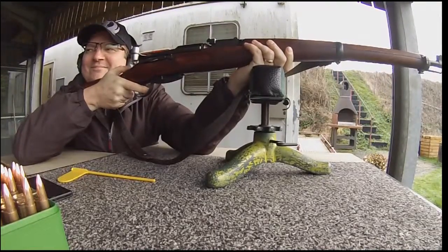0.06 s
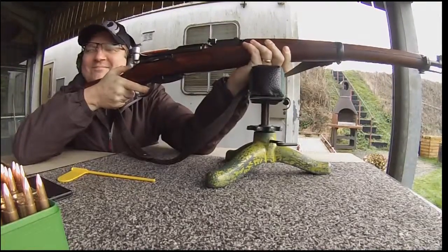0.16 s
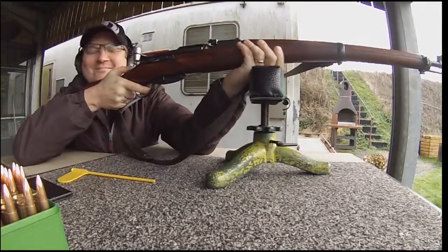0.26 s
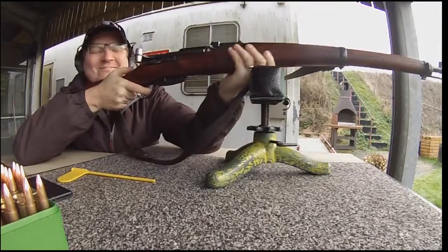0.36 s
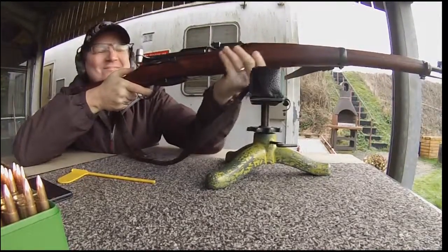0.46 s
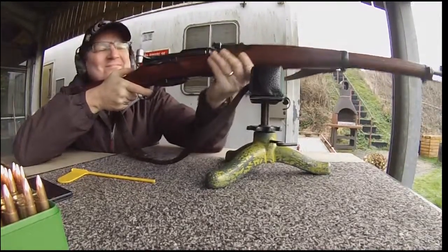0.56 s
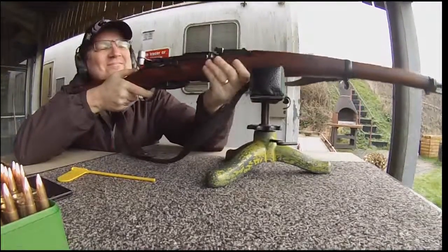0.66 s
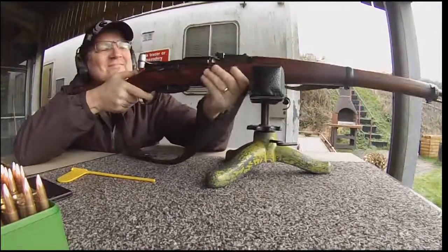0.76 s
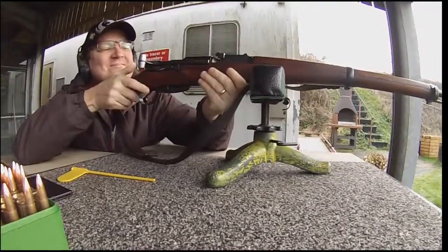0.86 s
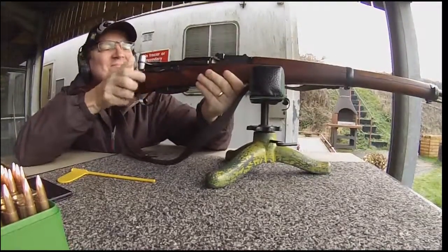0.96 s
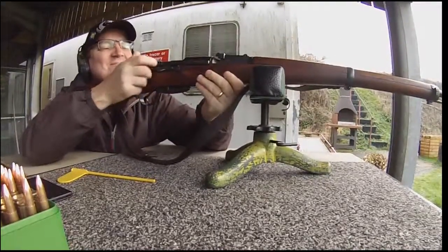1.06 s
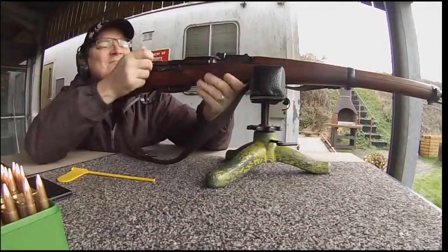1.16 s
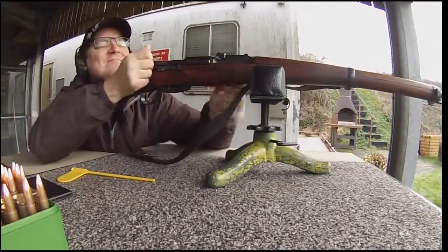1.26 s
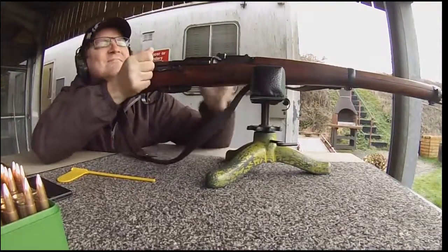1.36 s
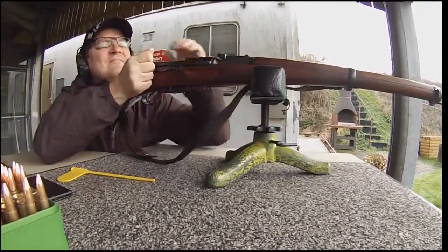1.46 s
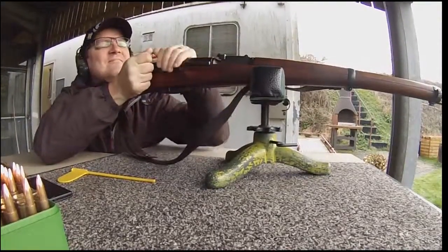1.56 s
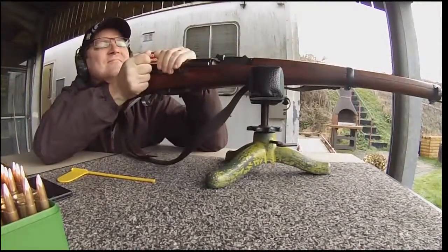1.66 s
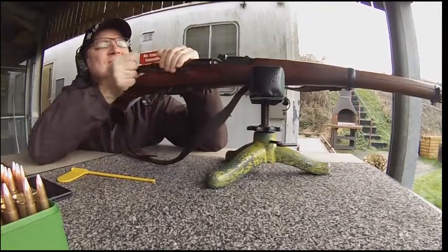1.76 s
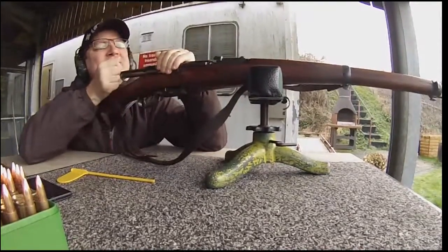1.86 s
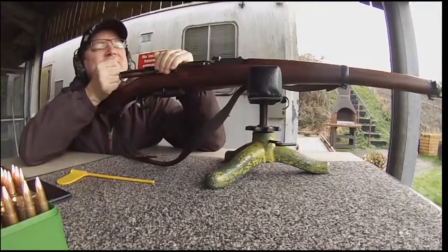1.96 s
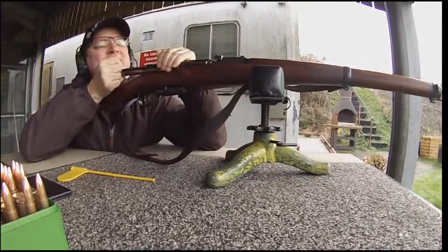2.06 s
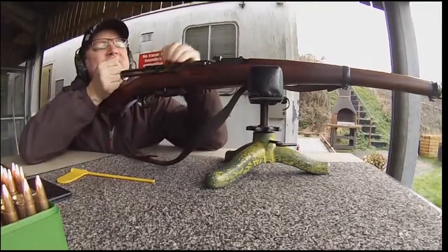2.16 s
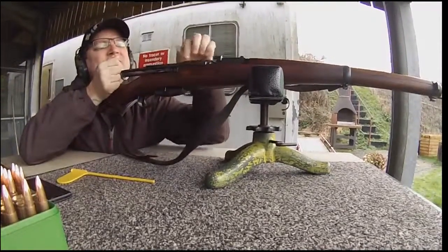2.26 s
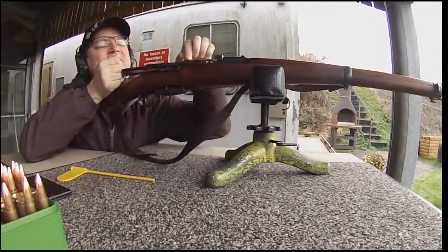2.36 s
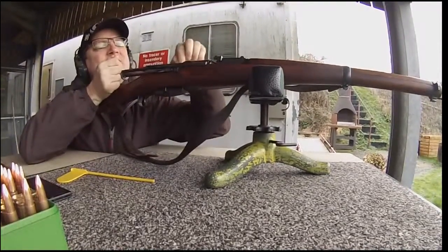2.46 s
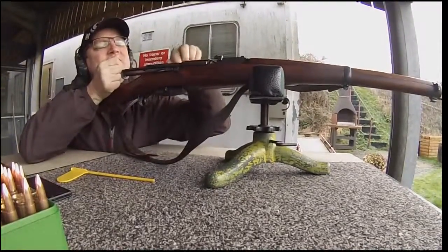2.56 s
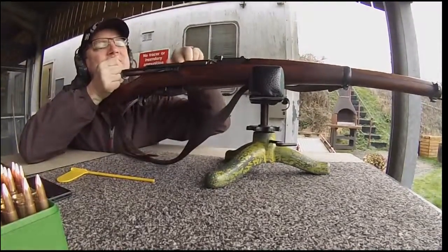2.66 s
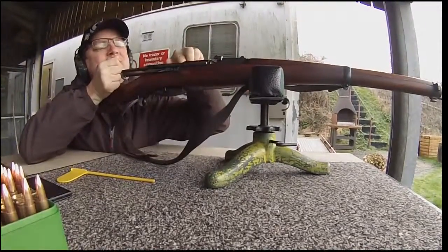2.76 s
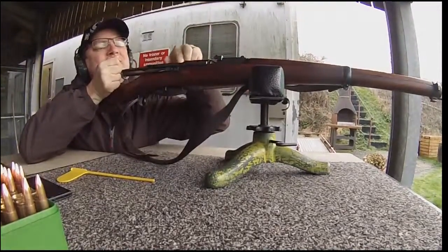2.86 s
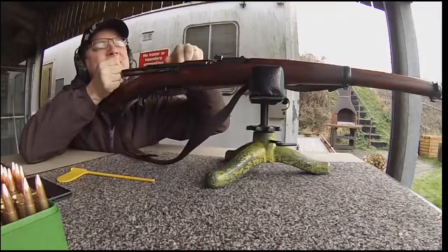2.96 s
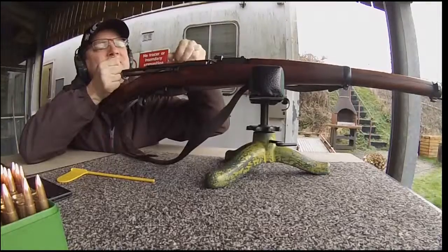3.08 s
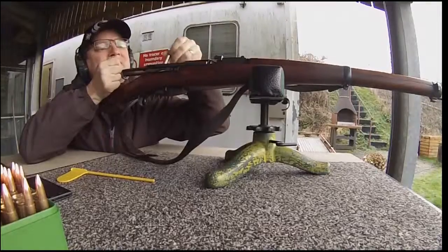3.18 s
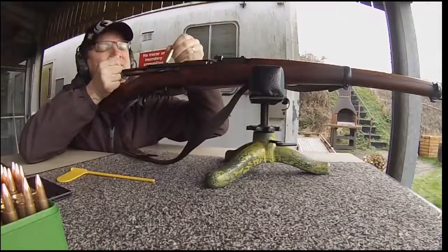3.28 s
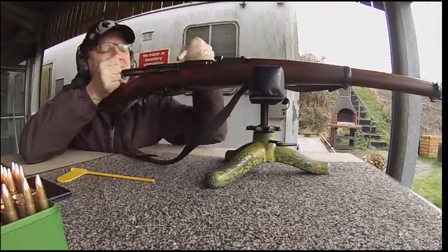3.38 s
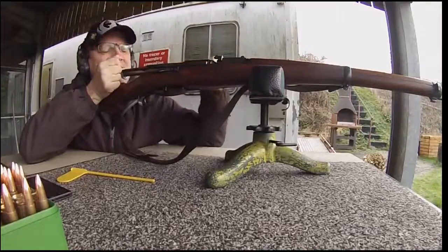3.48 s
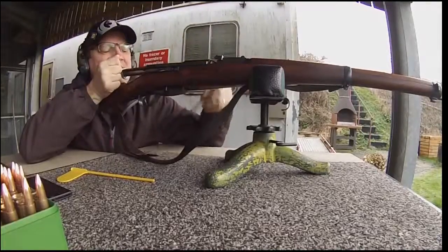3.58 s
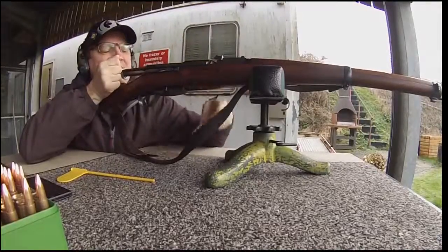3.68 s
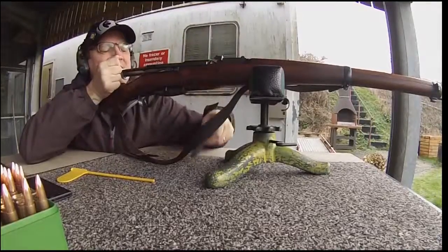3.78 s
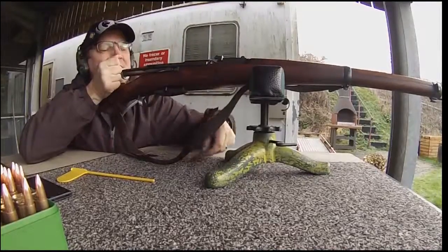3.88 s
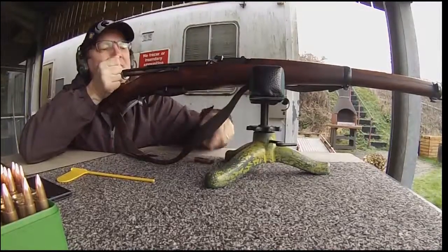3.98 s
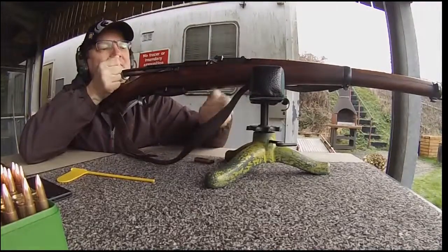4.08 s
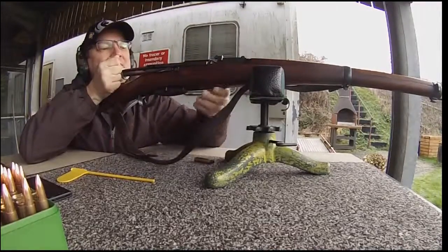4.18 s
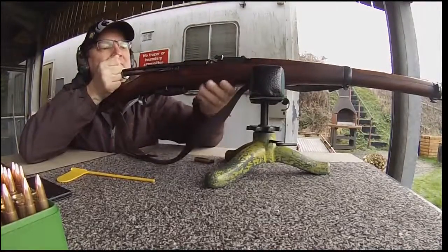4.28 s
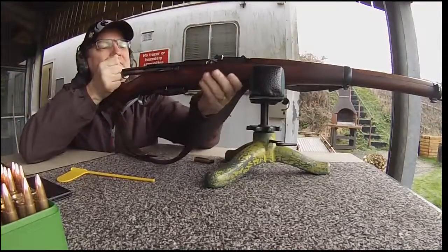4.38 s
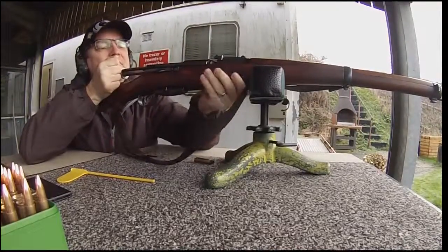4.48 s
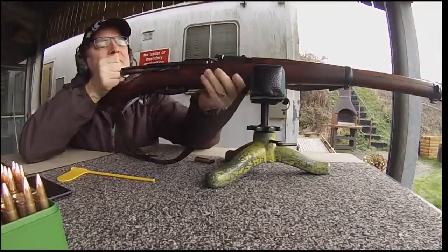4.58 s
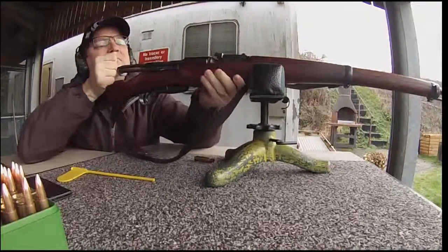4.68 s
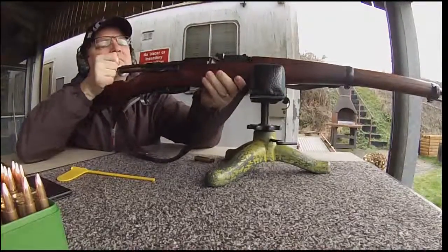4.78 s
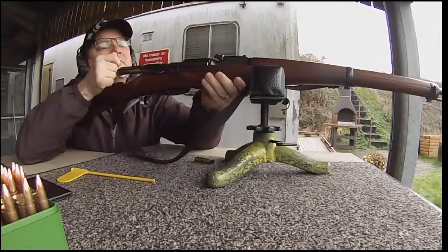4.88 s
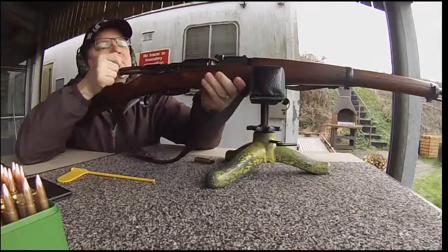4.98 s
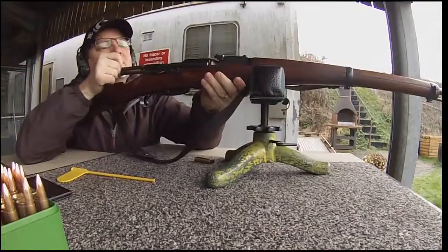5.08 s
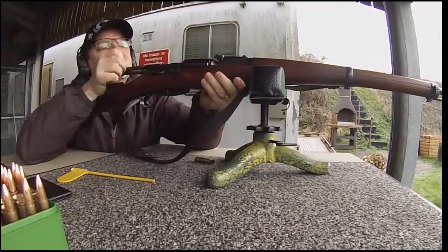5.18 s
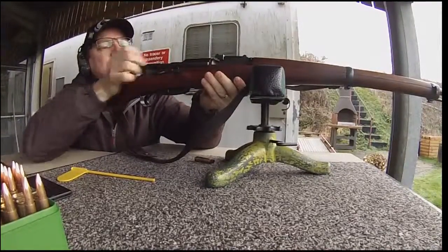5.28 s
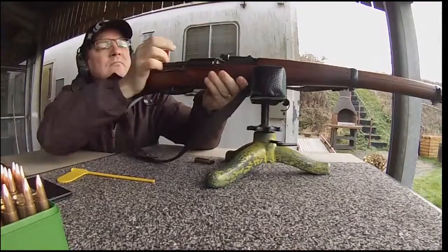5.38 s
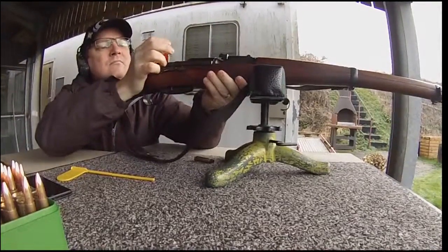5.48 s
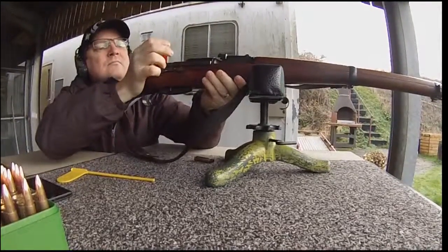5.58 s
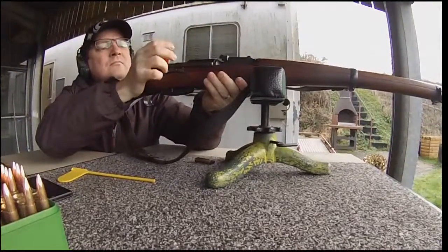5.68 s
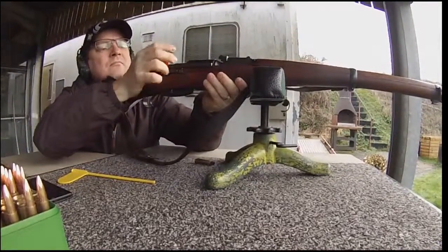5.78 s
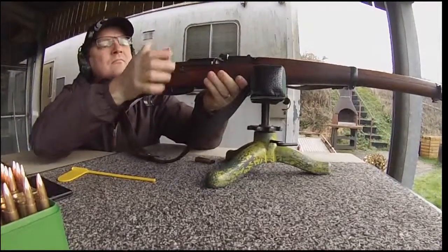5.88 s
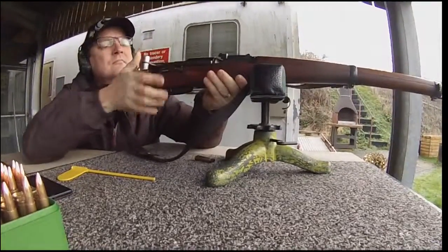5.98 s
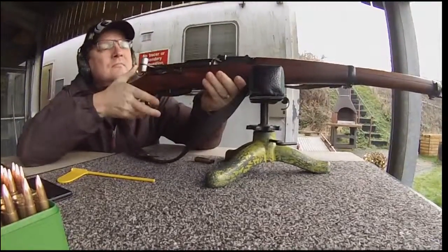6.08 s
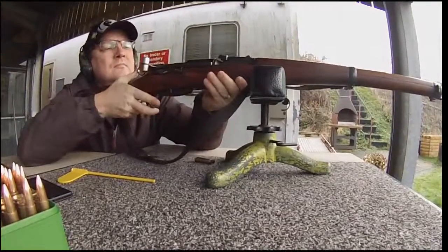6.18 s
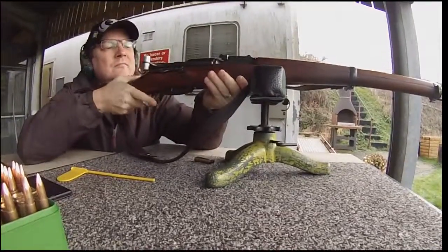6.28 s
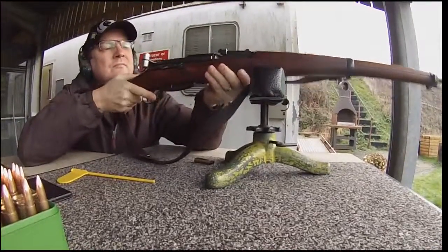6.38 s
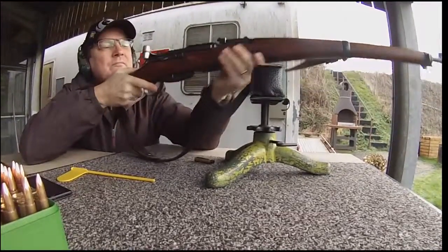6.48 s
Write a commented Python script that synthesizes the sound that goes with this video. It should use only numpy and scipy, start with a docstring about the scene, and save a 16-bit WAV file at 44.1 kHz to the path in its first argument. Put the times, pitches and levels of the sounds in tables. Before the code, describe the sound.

Close metallic clacks of a rifle bolt opening and later locking shut, with soft handling rustle and small hollow knocks in quiet air.

```python
"""Outdoors, at a roofed shooting bench: a rifle on a rest, heard close from a small camera on the same top.
In quiet air, elbows shake the bench and a sleeve brushes the rifle; the camera rocks and knocks on its base.
Near 1 s the bolt is lifted with a faint click; near 2 s it is drawn back: steel clacks ring under the roof
and the spent case pings free. A hand scrapes over the open action.
Just after 5 s the bolt is run home and locked, thumping the bench, and the camera knocks a little longer."""
import sys
import numpy as np
from scipy import signal
from scipy.fft import rfft, irfft, next_fast_len
from scipy.io import wavfile
from scipy.ndimage import uniform_filter1d

SR = 44100
rng = np.random.default_rng(int(sys.argv[2]) if len(sys.argv) > 2 else 0)


def log_audio(samples):
    """Write samples as a 16-bit WAV file to the path given in sys.argv[1]."""
    # one column per channel
    frames = np.atleast_2d(samples).T
    # limit to full scale, then quantise
    limited = np.clip(frames, -1, 1)
    pcm = np.round(limited * 32767).astype(np.int16)
    wavfile.write(sys.argv[1], SR, pcm)


N = 288237
TIME = np.arange(N) / SR
AGE = TIME[:SR // 3]  # seconds into one short sound


def undb(db):
    """Decibels to gain."""
    return 10 ** (np.asarray(db) / 20)


def colour(x, points):
    """Filter by a (Hz, dB) spectrum, causally, so that attacks stay sharp."""
    size = 2 * next_fast_len(len(x))
    hz, db = np.transpose(points)
    log_hz = np.log(np.fft.rfftfreq(size, 1 / SR) + 1)
    cepstrum = irfft(np.log(undb(np.interp(log_hz, np.log(hz), db))))
    cepstrum[1:size // 2] *= 2  # fold to minimum phase
    cepstrum[size // 2 + 1:] = 0
    return irfft(rfft(x, size) * np.exp(rfft(cepstrum)))[:len(x)]


def noise(points):
    """Coloured noise of rms 1."""
    x = colour(rng.standard_normal(N), points)
    return x / x.std()


def walk(rate_hz):
    """Smooth random wander with a spread of 1."""
    hold = int(SR / rate_hz)
    steps = np.repeat(rng.standard_normal(N // hold + 1), hold)
    x = uniform_filter1d(steps, hold)[:N]
    return x / x.std()


def hit(x, db, span_s=.005):
    """Scale a blow to the energy of span_s seconds at this level."""
    return x * undb(db) / np.sqrt(np.sum(x ** 2) / (SR * span_s))


def add(track, s, x):
    """Mix a sound into the track at s seconds."""
    i = max(int(s * SR), 0)
    track[i:i + len(x)] += x[:max(N - i, 0)]


def mode(hz, t60):
    """One fading sine."""
    return np.sin(2 * np.pi * hz * AGE) * undb(-60 * AGE / t60)


def chatter(contact_s):
    """Contact force: a burst of tiny collisions that swells and dies on the scale of contact_s."""
    u = AGE / max(contact_s, 1 / SR)
    return np.sign(rng.standard_normal(len(AGE))) * u * np.exp(-u * np.sqrt(u))


def gesture(s, db, rise_s, fall_s):
    """Gain over time of one movement: it grows to its peak at s, then dies away."""
    t = TIME - s
    return undb(db) * np.exp(-np.abs(t) / np.where(t < 0, rise_s, fall_s))


def together(gains):
    """Overlapping movements add in power."""
    return np.sqrt(sum(g ** 2 for g in gains))


# Open air with microphone hiss, and a low rustle. Each row: frequency in Hz, relative level in dB.
AIR_SPECTRUM = [(15, -43), (25, 11), (93, 0), (246, 0), (322, -3.5), (399, -7), (567, -7), (804, -8.5),
                (1270, -12), (1450, -12), (2490, -14.5), (2920, -13), (3530, -17), (13900, -30.5),
                (15500, -45.5)]
RUSTLE_SPECTRUM = [(100, -22), (250, 7), (600, 8), (1100, -3), (2500, -10), (8000, -21.5)]
# Swells of that rustle. Each entry: its middle in seconds.
SWELL_TIMES = [0.2, 1.054, 2.553, 2.96, 3.14, 3.363, 3.72, 3.94, 4.503, 5.13]

def outdoors(air_db=-57.38, flicker_db=-.42, swell_db=-57.5, swell_width_s=.033):
    """Quiet air all around the shelter, with a few soft swells of rustle."""
    swells = sum(np.exp(-((TIME - s) / swell_width_s) ** 2 / 2) for s in SWELL_TIMES)
    air = noise(AIR_SPECTRUM) * undb(air_db + flicker_db * walk(2.7))
    return air + undb(swell_db) * swells * noise(RUSTLE_SPECTRUM)


# Low thumps through the bench from the bolt's strokes and shifting weight.
# Each row: peak in seconds, relative level in dB.
BENCH_THUMPS = [(0.05, -39.5), (0.19, -51.5), (1.52, -48.5), (1.68, -43.5), (1.915, -30.5), (5.21, -49),
                (5.364, -28.5), (5.431, -33)]
# The bench top under the microphone. Each row: frequency in Hz, relative level in dB.
RUMBLE_SPECTRUM = [(20, -14.5), (45, -6.5), (70, -8.5), (90, -3.5), (115, -0.5), (160, -20), (300, -26.5),
                   (700, -36.5), (3000, -86)]
SHAKE_SLOPE = .65  # dB of rumble and sway per dB of camera knock

def bench_rumble(thump_db=-7, shake_db=-21.5, rise_s=.0092, fall_s=.07):
    """The bench rumbles with each low thump and around each knock of the camera."""
    pushes = [(s, db + thump_db) for s, db in BENCH_THUMPS]
    pushes += [(s, SHAKE_SLOPE * knock + shake_db) for s, knock, _, _ in CAMERA_KNOCKS]
    return noise(RUMBLE_SPECTRUM) * together(gesture(s, db, rise_s, fall_s) for s, db in pushes)


# Fingers and sleeve brush the rifle. Each row: peak in seconds, relative level in dB, fade in seconds.
SLEEVE_BRUSHES = [(0.3, -59, .13), (0.94, -57.5, 0.058), (1.3, -60.5, 0.17), (1.6, -53, 0.15),
                  (3.306, -45, 0.015), (4.0, -59, 0.16), (4.95, -63, 0.39), (6.42, -61, .14)]
# Cloth and skin rubbing, heard close. Each row: frequency in Hz, relative level in dB.
CLOTH_SPECTRUM = [(900, -20), (1450, -17.5), (1750, 0.5), (2300, -13.5), (2900, -2), (3450, 6),
                  (4300, -8.5), (5400, -10.5), (8000, -16), (14000, -31)]
SKIN_SPECTRUM = [(100, -6), (350, -2), (1000, -3.5), (2300, -6.5), (3400, 4), (4500, -14), (7000, -22),
                 (14000, -42)]

def hand(rough_db=3, brush_db=-1):
    """Skin and cloth catch and slip on steel and wood; once, a hand scrapes over the open action."""
    brush = together(gesture(s, db + brush_db, fade, fade) for s, db, fade in SLEEVE_BRUSHES)
    scrape = gesture(s=2.696, db=-45, rise_s=.005, fall_s=.14)
    friction = noise(SKIN_SPECTRUM) * scrape + noise(CLOTH_SPECTRUM) * brush
    return friction * undb(rough_db * walk(250))


def jiggle(tip_s, lead_s=.005, trail_s=.018, grain_db=8):
    """Tiny contacts thicken as the camera tips and thin out after it lands, tip_s later."""
    t = AGE - tip_s
    knots = AGE[::100]
    grains = rng.standard_normal(len(AGE))
    grains *= undb(grain_db * np.interp(AGE, knots, rng.standard_normal(len(knots))))
    return grains * np.exp(-np.abs(t) / np.where(t < 0, lead_s, trail_s))


# The camera lands on the bench. Each row: start in seconds, then knock, tick and thump in relative dB.
CAMERA_KNOCKS = [(0.511, -34.5, -43.5, -27.5), (0.589, -45, -50.5, -35), (0.597, -37.5, -60, -41),
                 (0.638, -22, -35, -21.5), (0.714, -48.5, -76, -45), (0.746, -40, -50, -42),
                 (1.558, -55, -78.5, -36), (1.767, -45.5, -66, -35), (1.939, -37.5, -57, -48),
                 (1.964, -31, -64, -26), (2.016, -37, -47, -33), (2.0792, -37.5, -39.5, -55),
                 (2.1116, -37.5, -79, -32.5), (2.241, -40.5, -39, -54), (2.2748, -37.5, -69, -28.5),
                 (2.3831, -39, -41, -57), (2.4184, -37, -77.5, -28), (2.456, -49.5, -54, -47),
                 (4.639, -47, -56, -31.5), (4.6486, -37, -47.5, -40), (4.746, -23, -38.5, -32),
                 (4.778, -29.5, -42.5, -26), (4.859, -44.5, -58, -33), (4.884, -42, -52.5, -30.5),
                 (5.5623, -32.5, -75, -24.5), (5.613, -39, -47, -27), (5.673, -29.5, -66, -55),
                 (5.677, -31, -47, -33), (5.7053, -31, -39.5, -33.5), (5.784, -34, -44.5, -34),
                 (5.796, -33, -57, -38), (5.838, -24.5, -36, -23.5), (5.923, -29, -45.5, -28),
                 (5.9447, -35.5, -45, -28), (5.971, -44, -65, -37), (6.0308, -41.5, -44.5, -54),
                 (6.047, -27.5, -41, -22), (6.0651, -28.5, -41, -40), (6.1863, -33.5, -44.5, -57),
                 (6.198, -35.5, -56, -23), (6.32, -44, -45.5, -55), (6.366, -46, -80, -34)]
# Modes of camera and base. Each row: frequency in Hz, relative level in dB, 60 dB decay in seconds.
BASE_MODES = [(495, -25, .12), (974, -6, .033), (1125, -1, .04), (1350, -2, .02), (1620, 0, .03),
              (1852, -12, .09), (2100, -9, .012), (2417, -11, .022), (2665, -14, .11)]
# Its loose parts, and the tick of a hard landing. Each row: frequency in Hz, relative level in dB.
RATTLE_SPECTRUM = [(100, -10), (280, -3.5), (430, -19.5), (700, -7), (1150, -2), (1700, -2), (2500, -6),
                   (3500, -18.5), (6000, -44.5)]
TICK_SPECTRUM = [(1000, -29), (2500, -0.5), (3600, 4.5), (4900, -10.5), (6700, -2.5), (8000, -22.5),
                 (14000, -30.5)]

def camera_knocks(tip_s=.04, scatter_db=3, detune=.0084, soft_hard_db=(-30, -14), edge_hz=(1850, 3400)):
    """Landings rattle the base and swing the bench top, reaching the microphone dry through the solid."""
    out = np.zeros(N)
    for s, knock_db, tick_db, thump_db in CAMERA_KNOCKS:
        chance = rng.standard_normal((len(BASE_MODES), 2))
        body = sum(undb(db + scatter_db * louder) * mode(hz * (1 + detune * sharper), t60)
                   for (hz, db, t60), (louder, sharper) in zip(BASE_MODES, chance))
        hardness_db = tick_db - knock_db  # a soft landing has little tick and a duller knock
        lowpass = signal.butter(4, np.interp(hardness_db, soft_hard_db, edge_hz), fs=SR, output="sos")
        knock = signal.fftconvolve(chatter(.00057), body)[:len(AGE)]
        rattle = colour(chatter(.0034), RATTLE_SPECTRUM)
        add(out, s, hit(signal.sosfilt(lowpass, knock), knock_db - 2))
        add(out, s, hit(signal.sosfilt(lowpass, rattle), knock_db - 3))
        add(out, s - tip_s, hit(colour(jiggle(tip_s), RATTLE_SPECTRUM), knock_db - 14))
        add(out, s, hit(colour(chatter(.0019), TICK_SPECTRUM), tick_db - 1))
        thump = hit(mode(hz=116, t60=.09), thump_db - 2)
        sway = hit(mode(hz=45.5, t60=.26), SHAKE_SLOPE * knock_db - 12)
        # hard and soft landings fall on opposite edges of the base and push opposite ways
        direction = np.copysign(1, hardness_db - np.mean(soft_hard_db))
        add(out, s, direction * (thump + sway))
    return out


# Ring of the steel clacks, coloured by the camera's housing.
# Each row: frequency in Hz, width in Hz, relative level in dB.
RING_PEAKS = [(2500, 250, -19), (2850, 150, -9), (3140, 150, -1), (3340, 150, -1), (3520, 150, 0),
              (3940, 130, -15), (4680, 200, -26), (5270, 250, -27)]

def steel_ring(force):
    """Steel rings under a force, with little bass, coloured by the camera's housing."""
    ring = sum((-1) ** k * undb(db) * signal.lfilter(*signal.iirpeak(hz, hz / width, fs=SR), force)
               for k, (hz, width, db) in enumerate(RING_PEAKS))
    return signal.sosfilt(signal.butter(2, 2100, "high", fs=SR, output="sos"), ring)


# Steel on steel. Each row: start in seconds, ring and crack in relative dB, contact time in seconds.
BOLT_CLACKS = [(0.921, -54.5, -65, 0.0013), (1.61, -47.5, -55.5, 0.0025), (1.7328, -35.5, -60.5, 0.0015),
               (1.796, -19, -28.5, 0.0023), (1.81, -30.5, -55.5, 0.0053), (1.8864, -14.5, -22.5, 0.0025),
               (1.9024, -22, -41, 0.0025), (1.995, -30.5, -42, 0.0016), (2.762, -48, -51, 0.0018),
               (2.931, -41.5, -44, 0.0023), (3.283, -44, -55, 0.0016), (3.322, -48.5, -51, 0.0018),
               (5.182, -45.5, -56, 0.0011), (5.282, -33, -43.5, 0.003), (5.298, -40, -56.5, 0.0011),
               (5.3554, -12.5, -27, 0.0022), (5.3682, -23.5, -33, .003), (5.376, -18.5, -38.5, .003),
               (5.403, -10.5, -18, 0.0019), (5.4165, -13, -22, 0.0015), (5.4318, -31.5, -47.5, 0.0021)]
# The crack of contact, and the wooden stock's answer. Each row: frequency in Hz, relative level in dB.
CRACK_SPECTRUM = [(1000, -19.5), (3000, -17.5), (4500, 1.5), (5300, -0.5), (6500, 0.5), (8000, -1),
                  (10000, -9), (13000, -19), (15500, -36)]
STOCK_SPECTRUM = [(400, -27), (1100, -17.5), (1450, -16.5), (1720, 7.5), (2000, -12), (2500, -8.5),
                  (3500, -40)]

def bolt_clacks(ring_db=3, crack_db=1.56, stock_db=-17, rebound_s=.0042, rebound_db=-10):
    """The bolt strikes its stops and rebounds once; the stock takes a share of each blow."""
    out = np.zeros(N)
    for s, ring, crack, contact_s in BOLT_CLACKS:
        for at, db in ((s, 0), (s + rebound_s, rebound_db)):
            add(out, at, hit(steel_ring(chatter(.76 * contact_s)), ring + ring_db + db))
            add(out, at, hit(colour(chatter(contact_s), CRACK_SPECTRUM), crack + crack_db + db))
        add(out, s, hit(colour(chatter(contact_s), STOCK_SPECTRUM), ring + stock_db))
    return out


def near_echoes(x, db=-14, t60=.11, delay_s=.0058):
    """Bench, shooter and posts, close to the microphone, scatter each clack straight back."""
    scatter = rng.standard_normal(len(AGE)) ** 3 * undb(-60 * AGE / t60) * (AGE > delay_s)
    return undb(db) * signal.fftconvolve(x, scatter / np.linalg.norm(scatter))[:N]


# The echo under the roof. Each row: band centre in Hz, level in dB, 60 dB decay in seconds.
SHELTER_BANDS = [(400, 1.5, 1), (1000, -6.5, 1), (1910, -3.5, 0.61), (2534, -13, .7), (3320, -20, 0.5),
                 (4150, -11, 0.56), (7100, -13.5, 0.24), (10000, -11.5, 0.32), (15000, -21.5, 0.24)]

def shelter_echo(x, build_s=.0027):
    """Roof, posts and wall return a diffuse tail whose treble dies first."""
    hz, db, t60 = np.transpose(SHELTER_BANDS)
    log_hz = np.log(np.fft.rfftfreq(SR, 1 / SR) + 1)
    white, t = rfft(rng.standard_normal(SR)), TIME[:SR]
    tail = 0
    for weights, band_db, band_t60 in zip(np.eye(len(hz)), db, t60):
        band = irfft(white * np.interp(log_hz, np.log(hz), weights))
        fade = undb(-60 * t / band_t60) * (1 - np.exp(-(t / build_s) ** 2))
        tail = tail + undb(band_db) * band * fade / np.linalg.norm(fade)
    return signal.fftconvolve(x, tail)[:N]


# The bolt's travel. Each row: stop in seconds, relative level in dB, rise in seconds.
BOLT_SLIDES = [(1.8, -48, 0.054), (1.886, -30.5, 0.0066), (1.925, -38.5, .02), (5.354, -27, .016),
               (5.382, -25.5, 0.01), (5.425, -34.5, .015)]

def bolt_slides(slide_db=-2, grit_db=4, hiss_db=-15, stock_db=-18, fall_s=.01):
    """The bolt grinds along its raceway, gathering speed until it is stopped."""
    ring = steel_ring(rng.standard_normal(N))
    grit = ring / ring.std() + undb(hiss_db) * noise(CRACK_SPECTRUM)
    grit += undb(stock_db) * noise(STOCK_SPECTRUM)
    speed = together(gesture(s, db, rise_s, fall_s) for s, db, rise_s in BOLT_SLIDES)
    return grit * speed * undb(slide_db + grit_db * walk(300))


# Modes of the spent case. Each row: frequency in Hz, level in dB, 60 dB decay in seconds.
CASE_MODES = [(8753, -44, .21), (11590, -48, .18), (11635, -43, .23), (13510, -45, .14), (13570, -44, .14)]

def case_ping(start_s=1.889):
    """The brass case rings as it is jerked free."""
    out = np.zeros(N)
    add(out, start_s, sum(undb(db) * mode(hz, t60) for hz, db, t60 in CASE_MODES))
    return out


def scene():
    """One microphone on the bench: the action arrives through the air with its echoes, the knocks dry."""
    action = bolt_clacks() + bolt_slides() + case_ping()
    echoes = near_echoes(action) + shelter_echo(action)
    return (action + echoes + camera_knocks() + bench_rumble() + hand() + outdoors())[None]


def record(dry):
    """The camera rounds the highest peaks and cuts the treble above 15.7 kHz."""
    rounded = 1.347 * np.tanh(dry / 1.669)
    return signal.sosfiltfilt(signal.ellip(8, .1, 60, 15700, fs=SR, output="sos"), rounded)


dry = scene()
out = record(dry)
log_audio(out)
```